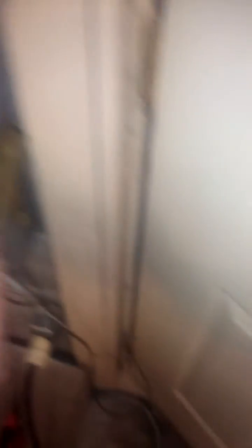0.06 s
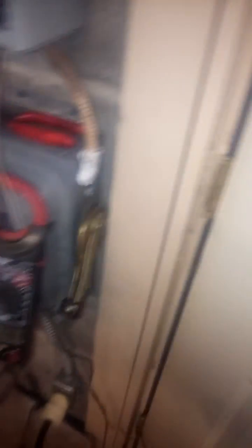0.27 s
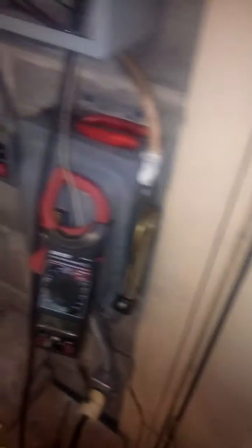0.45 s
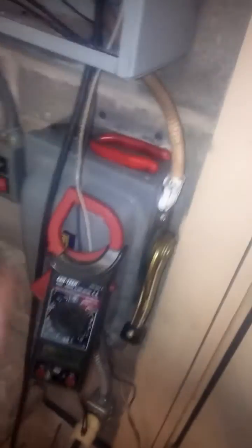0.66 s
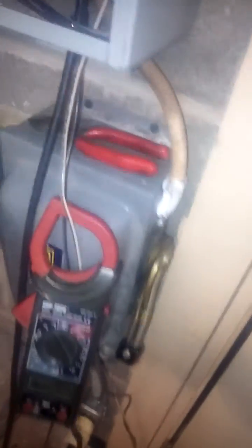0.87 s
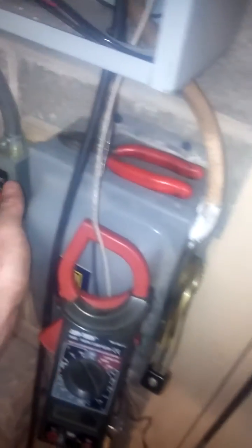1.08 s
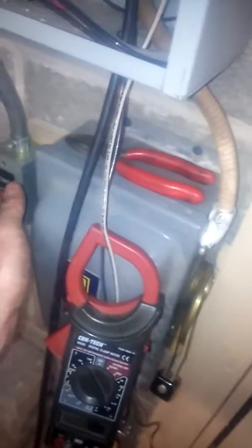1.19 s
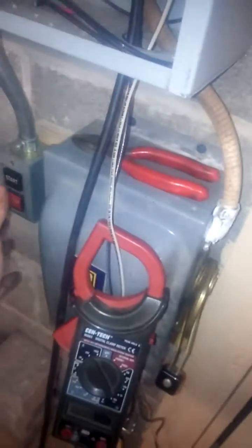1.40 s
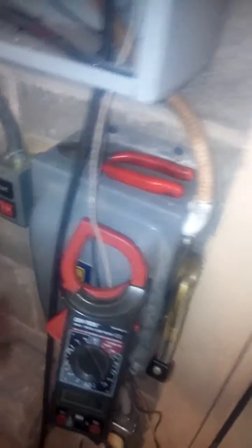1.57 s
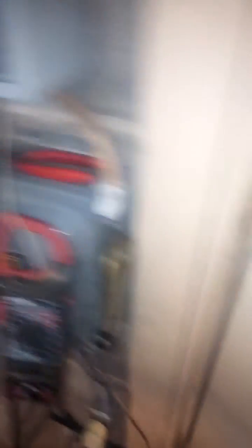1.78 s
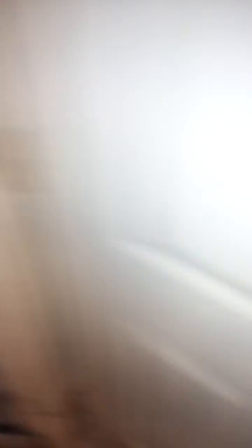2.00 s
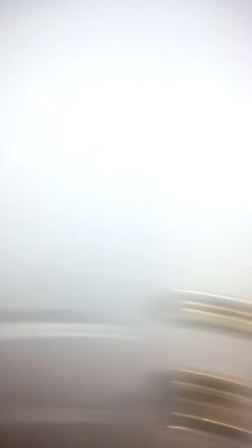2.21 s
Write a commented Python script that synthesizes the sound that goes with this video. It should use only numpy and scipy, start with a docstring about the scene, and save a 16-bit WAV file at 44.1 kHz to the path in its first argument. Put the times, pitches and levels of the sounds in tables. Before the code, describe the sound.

A heavy switch slams shut in a steel box at about 0.2 seconds, a close metallic clunk ringing briefly in a small room. A motor starts with a deep electrical hum, slight whine and throbbing rush. At about 1.3 seconds the switch drops out with a rattling clunk. The machine shudders, then coasts with a faint sinking tone until just past 2 seconds. Soft hiss lies underneath.

```python
"""A small hard-walled room, heard from close by. A heavy switch slams shut in a steel box: a burst of
blows, each ringing the switch's iron, the box and the room. A motor takes up load with a deep mains
hum, a rotor whine and a throbbing rush. A second later the switch drops out and rattles, the machine
shudders, and its tone sinks as it coasts. A faint hiss lies underneath."""
import sys
import numpy as np
from scipy import signal
from scipy.fft import rfft, irfft, next_fast_len
from scipy.io import wavfile
from scipy.ndimage import map_coordinates

SR = 44100
rng = np.random.default_rng(int(sys.argv[2]) if len(sys.argv) > 2 else 0)


def bounce(signal):
    """Save signal as a 16-bit WAV file at the path given by the first command-line argument."""
    frames = np.transpose(np.atleast_2d(signal))
    limited = np.clip(frames, -1, 1)
    pcm = np.round(limited * 32767).astype(np.int16)
    wavfile.write(sys.argv[1], SR, pcm)


N = 99225

# Switch blows, closing then opening: start_s, clack_db, tilt_db_per_octave, thud_db, ping_hz, ping_db
BLOWS = [(0.2014, -29.5, 3.5, -40.5, 3020, -28.5), (0.2256, -11.5, 1.3, -23, 1260, -9.5),
         (0.2441, -14, 4, -23, 1210, -15), (.2515, -16.5, -2.5, -24, 2920, -20),
         (0.2728, -13.5, 2.5, -22.5, 1617, -6), (.285, -16.5, -1.5, -26, 480, -15),
         (0.319, -23.5, 0.5, -40, 3230, -19), (1.268, -22, 5, -32, 1960, -15.5),
         (1.2721, -11, 1, -37.5, 5100, -13), (1.286, -19, 1.5, -28.5, 1024, -8.5),
         (1.301, -26.5, -6.5, -16, 480, -14), (1.3123, -17, -4.5, -13, 1396, -16),
         (1.3194, -26, 0.5, -13, 5670, -20.5), (1.336, -27.5, -2.5, -27, 415, -17.5),
         (1.374, -30.5, -4, -25.5, 387, -9.5), (1.4224, -33.5, 4, -25, 1990, -21.5)]
# Moving iron modes: pitch_hz, closing_db, opening_db, pan_db
IRON_MODES = [(1050, -15.5, -7.5, 5.5), (1158, -4, -2, -7), (1319, -6.5, -14.5, -12.5), (1730, -5, -19, -4),
              (1877, -3, -11.5, -8), (2280, -10, -2, -3), (2723, -6, -18, 11), (3270, -11, -20, 13)]
# Steel box modes: pitch_hz, closing_db, opening_db, pan_db
BOX_MODES = [(279, -27, -10.5, 2), (338.2, -3.5, -28.5, -6), (387.9, -0.5, -0.5, -2), (480, -16, 0, -9.5),
             (537.3, -0.5, -7, 3)]
IRON_DB, IRON_T60_S, BOX_T60_S = -5, 0.19, 0.3
OPEN_S = 1.266  # contacts part

def switch():
    """Each blow gives a noisy clack, rings the iron and the box, and pings the struck spot."""
    out = np.zeros((2, N + SR))
    t = np.arange(SR * 3 // 4) / SR
    ripple = rng.standard_normal((2, 2048))  # fine box resonances, common to all blows
    for start_s, clack_db, tilt, thud_db, ping_hz, ping_db in BLOWS:
        opening = start_s > OPEN_S
        iron = amp(IRON_DB) * ring(IRON_MODES, opening, t) * fade(t, IRON_T60_S)
        thud = ring(BOX_MODES, opening, t) * fade(t, BOX_T60_S)
        blow = amp(clack_db) * (clack(tilt, ripple, t) + iron)
        blow += amp(thud_db) * thud + amp(ping_db) * ping(ping_hz, t)
        start = round(start_s * SR)
        out[:, start:start + len(t)] += blow
    return out[:, :N]


def ring(modes, opening, t):
    """Struck modes, undamped; level and pitch vary slightly per blow."""
    out = np.zeros((2, len(t)))
    for hz, closing_db, opening_db, pan_db in modes:
        level_db = (opening_db if opening else closing_db) + rng.normal()
        out += pan(pan_db) * amp(level_db) * partial(hz * (1 + 0.0046 * rng.normal()), t)
    return out * (1 - fade(t, 0.0049))  # soft onset


# Clack spectrum: freq_hz, level_db
CLACK_SPECTRUM = [(40, -20), (150, -1), (850, 1.5), (1300, -0.5), (2000, 3.5), (2500, -4.5), (3200, -1.5),
                  (6500, -4.5), (12000, -21), (15500, -24)]
# Clack and ping balance: freq_hz, pan_db
BLOW_PAN = [(800, 1), (1400, -5), (3800, 2.5), (9000, 0.5)]
# Joint decay of box and room: freq_hz, t60_s
ROOM_DECAY = [(700, 0.4), (2000, 0.27), (6000, 0.29), (14000, 0.3)]
RIPPLE_DB, RIPPLE_SPACING_HZ = 3, 45.1
CRACK_DB, CRACK_T60_S = 4, 0.046
WASH_DB, WASH_RISE_S, LATE_DB, LATE_T60_S = -2.5, 0.00092, -23.5, 1

def clack(tilt_db_per_octave, ripple, t):
    """A short crack and a dense room wash, both coloured by the box's fine resonances."""
    def box_response(hz):
        knots = [hz / RIPPLE_SPACING_HZ]
        return amp([RIPPLE_DB * map_coordinates(side, knots, mode="mirror") for side in ripple])

    def waveform(spectra):
        return signal.istft(spectra, nperseg=256)[1][:, :len(t)]

    burst = unit(filtered(noise(CLACK_SPECTRUM), box_response))[:, :len(t)]
    hz, frame_s, spectra = signal.stft(burst, SR, nperseg=256)
    tilt = amp(tilt_db_per_octave * np.log2((hz + 200) / 3000))
    spectra = spectra * (tilt * pan(along(BLOW_PAN, hz)))[..., None]
    early = amp(WASH_DB) * fade(frame_s, along(ROOM_DECAY, hz[:, None]))
    late = amp(LATE_DB) * fade(frame_s, LATE_T60_S)
    wash = waveform(spectra * (early + late)) * (1 - np.exp(-t / WASH_RISE_S))
    crack = waveform(spectra)[:, ::-1]  # reversed: uncorrelated with the wash
    return amp(CRACK_DB) * crack * fade(t, CRACK_T60_S) + wash


def ping(hz, t, pair_ratio=1.13, t60_s=0.036):
    """The struck spot rings briefly: two close partials that beat."""
    return pan(along(BLOW_PAN, hz)) * (partial(hz, t) + partial(pair_ratio * hz, t)) * fade(t, t60_s)


# Motor load, gain on hum and whine: time_s, gain_db
LOAD = [(.14, -29), (.26, -19), (.297, -2), (.36, -.5), (.39, -3.5), (.42, 0), (1.268, -.7), (1.3, -12),
        (1.5, -40), (2.25, -56)]
# Hum at full load: mains_multiple, level_db, pan_db
HUM_HARMONICS = [(2, -12.5, 1), (4, -39.5, 10.5), (6, -39, -6.5), (8, -35.5, -11), (10, -36.5, 3.5),
                 (12, -40.5, 8.5), (14, -41.5, 6.5), (18, -47.5, 0)]
# Rotor whine at full load: pitch_hz, level_db
WHINE_TONES = [(391, -43), (1050, -39), (2353, -59)]
# Rush envelope: time_s, level_db
RUSH_LEVEL = [(0, -31), (.17, -33.5), (.4, -25.5), (.9, -28.5), (1.42, -27.5), (1.52, -62.5), (1.7, -60.5),
              (2.25, -56.5)]
# Rush spectrum: freq_hz, level_db
RUSH_SPECTRUM = [(35, -23.5), (60, -2.5), (140, 3.5), (330, -5.5), (800, -7), (1100, -9.5), (1600, -20),
                 (2900, -31.5), (15000, -50)]
# Low drone around the closing: time_s, level_db
DRONE_LEVEL = [(0, -45), (.075, -24), (.12, -51), (.22, -25.5), (.4, -65.5)]
MAINS_HZ, DRONE_HZ, THROB_DEPTH = 60, 301, 0.14
WAVER_DB, LOWEST_WAVER_DB = 1.5, 0.5

def motor():
    """Mains hum and rotor whine follow the load, over a throbbing rush and a brief wavering drone."""
    hum = np.zeros((2, N))
    for multiple, level_db, pan_db in HUM_HARMONICS:
        waver_db = (LOWEST_WAVER_DB if multiple == 2 else WAVER_DB) * wobble(28.8)
        hum += pan(pan_db) * amp(level_db + waver_db) * tone(multiple * MAINS_HZ)
    whine = sum(amp(db + WAVER_DB * wobble(8.9)) * tone(hz) for hz, db in WHINE_TONES)
    throb = 1 + THROB_DEPTH * np.sin(2 * np.pi * (2 * MAINS_HZ) * np.arange(N) / SR)
    rush = envelope(RUSH_LEVEL) * throb * noise(RUSH_SPECTRUM)
    drone = envelope(DRONE_LEVEL) * tone(DRONE_HZ + 8 * wobble(40))
    return envelope(LOAD) * (hum + whine) + rush + drone


# Shudder envelope: time_s, level_db
SHUDDER_LEVEL = [(1.25, -70), (1.3, -28), (1.43, -27), (1.58, -51), (1.8, -65)]
# Shudder rumble spectrum: freq_hz, level_db
RUMBLE_SPECTRUM = [(30, -23.5), (50, 1), (95, 4.5), (230, -5.5), (1000, -59)]
# Coasting rotor envelope: time_s, level_db
COAST_LEVEL = [(1.3, -50), (1.45, -45), (1.68, -48.5), (1.75, -66), (1.84, -49), (1.96, -62.5),
               (2.085, -39.5), (2.14, -40.5), (2.25, -48)]
SHUDDER_END_HZ, SHUDDER_DROP_HZ, SHUDDER_SETTLE_S = 57.1, 57.3, 0.04
COAST_START_HZ, SAG_HZ_PER_S = 252, 57

def run_down():
    """Without power the machine shudders, then coasts with a sinking tone."""
    off_s = np.maximum(np.arange(N) / SR - OPEN_S, 0)
    shudder_hz = SHUDDER_END_HZ + SHUDDER_DROP_HZ * np.exp(-off_s / SHUDDER_SETTLE_S)
    shudder = envelope(SHUDDER_LEVEL) * (tone(shudder_hz) + noise(RUMBLE_SPECTRUM))
    coast = envelope(COAST_LEVEL) * tone(COAST_START_HZ - SAG_HZ_PER_S * off_s)
    return shudder + pan(2.2) * coast * (off_s > 0)


# Hiss envelope: time_s, level_db
HISS_LEVEL = [(0, -41), (.6, -49.5), (1.2, -46), (1.7, -45.5)]
# Hiss spectrum: freq_hz, level_db
HISS_SPECTRUM = [(30, -6.5), (900, -4.5), (2600, -6), (3400, -0.5), (6300, 1.5), (12000, -19.5),
                 (15500, -33)]
# Bright hiss spectrum: freq_hz, level_db
BRIGHT_SPECTRUM = [(4000, -21), (9000, 1), (15000, -12.5)]
BRIGHT_DB, BRIGHT_FADE_DB_PER_S = -48, 16

def hiss():
    """A faint continuous hiss, and a brighter one that fades away."""
    bright = amp(BRIGHT_DB - BRIGHT_FADE_DB_PER_S * np.arange(N) / SR) * noise(BRIGHT_SPECTRUM)
    return bright + envelope(HISS_LEVEL) * noise(HISS_SPECTRUM)


# Left-right likeness: freq_hz, correlation
STEREO_CORRELATION = [(130, 1), (290, 0.88), (640, 0.44), (1400, 0)]

def spread(hz):
    """Half the angle between channels, in radians: zero in the bass, wide in the treble."""
    return np.arccos(np.clip(along(STEREO_CORRELATION, hz), -1, 1)) / 2


def noise(spectrum):
    """Coloured stereo noise, rms 1."""
    def response(hz):
        return amp(along(spectrum, hz)) * [np.cos(spread(hz)), np.sin(spread(hz))]

    mid, side = filtered(rng.standard_normal((2, N)), response)
    return unit(np.array([mid + side, mid - side]))


def tone(hz):
    """Stereo sine, rms 1, steady or gliding."""
    phase = 2 * np.pi * (np.cumsum(hz * np.ones(N)) / SR + rng.random())
    return np.sqrt(2) * np.sin(phase + np.array([[1], [-1]]) * spread(np.mean(hz)))


def partial(hz, t):
    """Stereo sine, peak 1, random phase."""
    return np.sin(2 * np.pi * (hz * t + rng.random()) + np.array([[1], [-1]]) * spread(hz))


def wobble(knots_per_s):
    """Smooth random curve."""
    knots = rng.standard_normal(int(N * knots_per_s / SR) + 4)
    return map_coordinates(knots, [np.arange(N) * knots_per_s / SR])


def envelope(points):
    """Gain per sample from (time_s, level_db) points."""
    time_s, level_db = np.transpose(points)
    return amp(np.interp(np.arange(N) / SR, time_s, level_db))


def fade(t, t60_s):
    """Exponential decay."""
    return np.exp(-np.log(1000) * t / t60_s)


def along(points, hz):
    """Interpolate (freq_hz, value) points on a log axis."""
    freq_hz, values = np.transpose(points)
    return np.interp(np.log(hz + 1), np.log(freq_hz + 1), values)


def filtered(x, response):
    """Apply the gain response(hz) by FFT."""
    size = next_fast_len(N + SR // 4)
    return irfft(rfft(x, size) * response(np.fft.rfftfreq(size, 1 / SR)), size)[..., :N]


def pan(db):
    """Channel gains for a left-minus-right level."""
    return amp(np.array([[.5], [-.5]]) * db)


def amp(db):
    """Decibels to gain."""
    return 10 ** (np.asarray(db) / 20)


def unit(x):
    """Scale to rms 1."""
    return x / np.sqrt(np.mean(x ** 2) + 1e-20)


def scene():
    """Switch, motor, run-down and hiss."""
    return switch() + motor() + run_down() + hiss()


CEILING, TOP_HZ = 0.95, 16000

def record(dry):
    """Soft peak limit, then a sharp low-pass."""
    rounded = dry / (1 + np.abs(dry / CEILING) ** 6) ** (1 / 6)
    return filtered(rounded, lambda hz: hz < TOP_HZ)


dry = scene()
out = record(dry)
bounce(out)
```